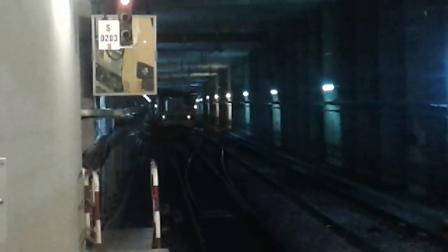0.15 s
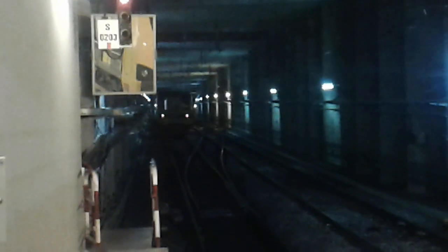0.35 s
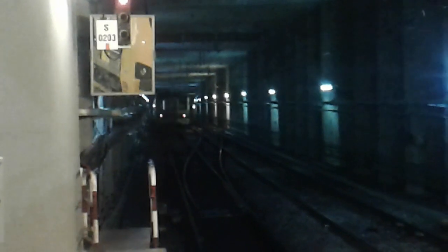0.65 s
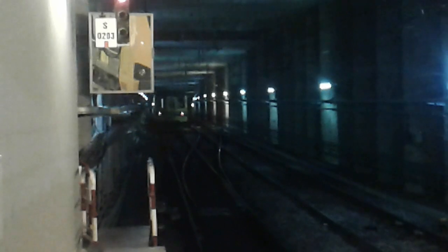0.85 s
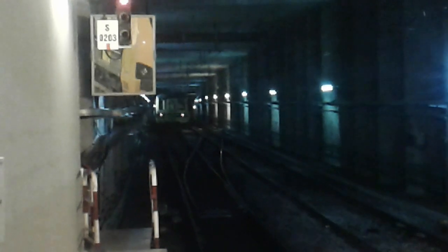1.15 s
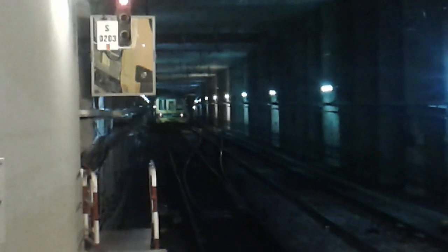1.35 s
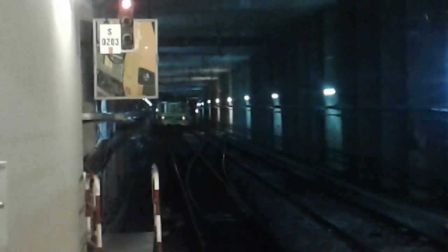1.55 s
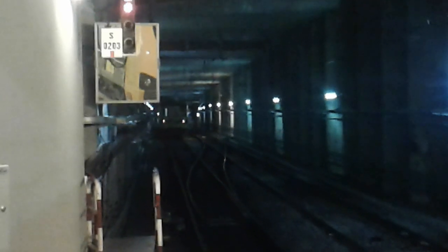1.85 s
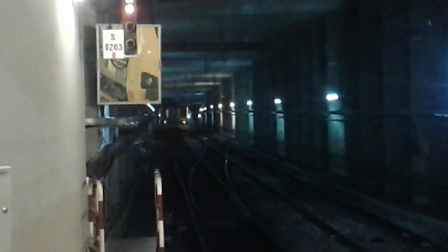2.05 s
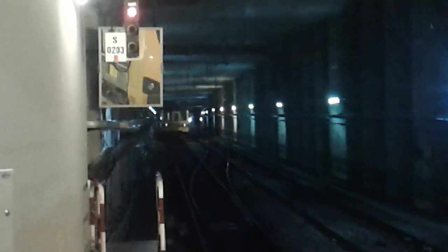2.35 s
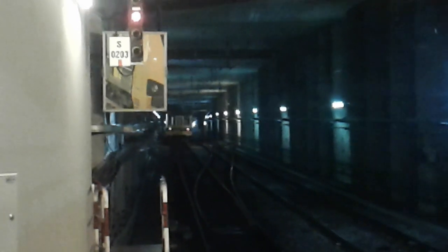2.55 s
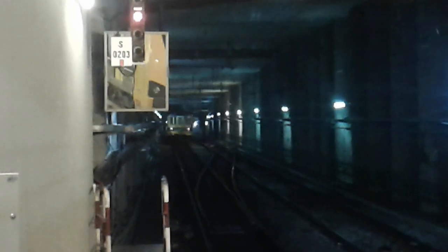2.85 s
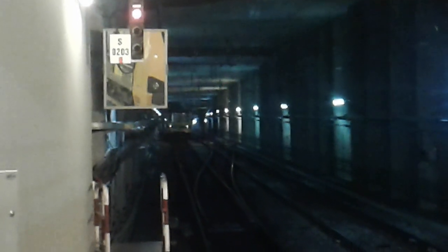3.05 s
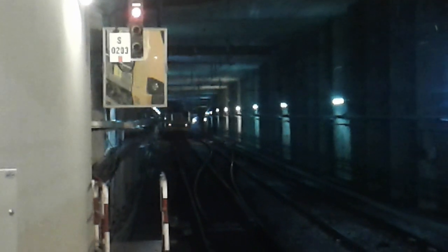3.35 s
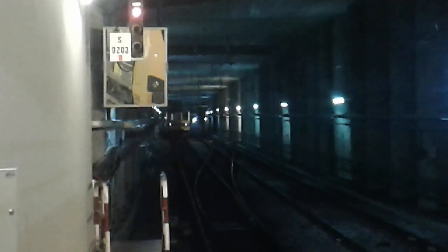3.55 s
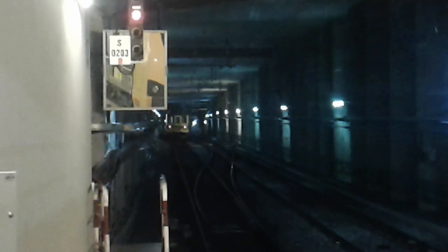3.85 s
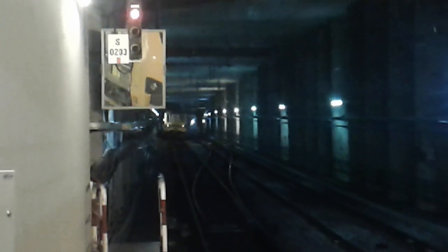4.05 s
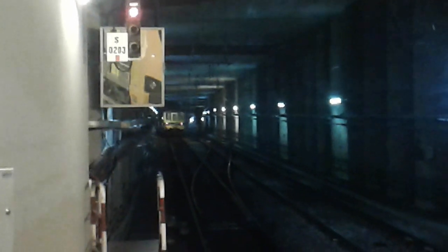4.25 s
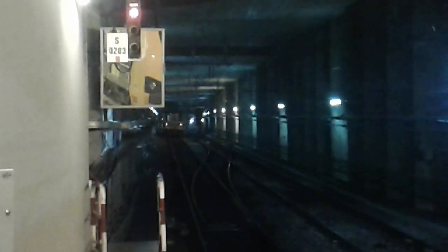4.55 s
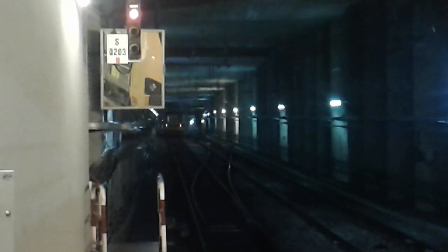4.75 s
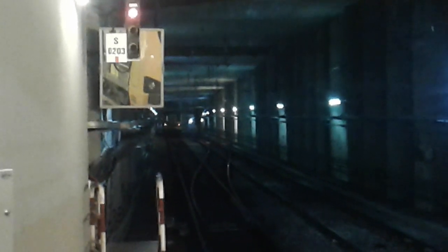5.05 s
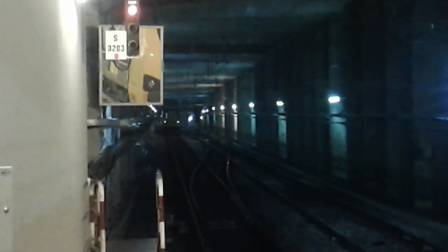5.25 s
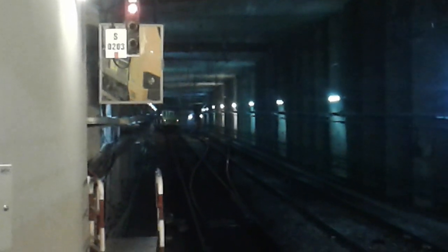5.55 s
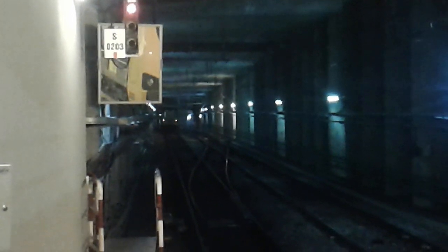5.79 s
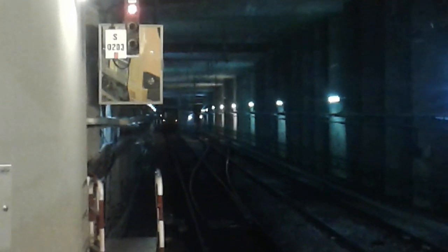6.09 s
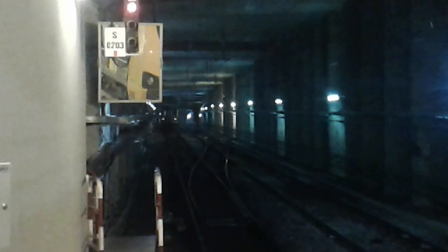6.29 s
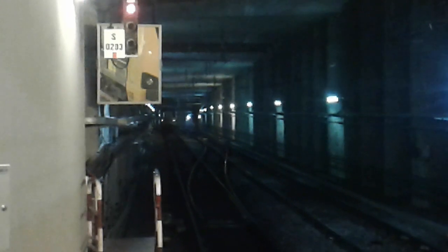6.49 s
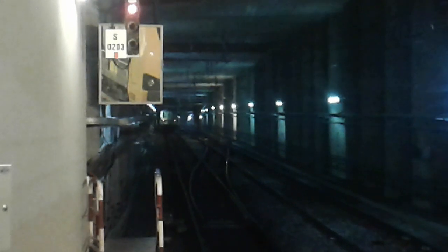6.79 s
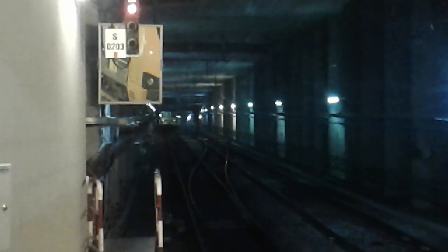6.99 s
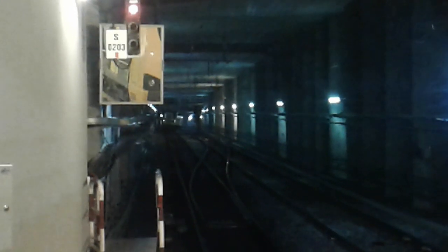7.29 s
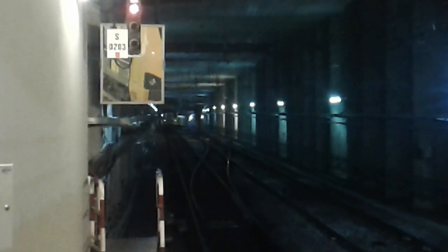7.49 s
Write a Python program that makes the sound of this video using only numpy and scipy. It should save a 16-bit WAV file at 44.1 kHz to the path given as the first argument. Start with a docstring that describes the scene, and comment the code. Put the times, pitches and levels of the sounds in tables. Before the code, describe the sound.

From a station platform, a departing subway train is heard rumbling and droning in an echoing tunnel, with a quick run of dull thuds from the rail joints and a brief ringing scrape. The drone dies away and the rumble slowly recedes. Past the middle come two low, swelling booms and more distant thuds, then two fainter wheel scrapes, all over station ventilation and slight microphone hiss.

```python
"""An electric subway train rolls away down a concrete tunnel, heard from the end of the platform.
At first its rumble, wheel roar, ringing rails and gear drone fill the tunnel, and bogies thud over
rail joints. The sound fades and dulls with distance; at 1.6 s a wheel flange brushes the rail.
From about 4 s the tunnel booms twice under a second run of thuds, and two fainter brushes follow.
The station's ventilation and a faint microphone hiss persist to the end."""
import sys
import numpy as np
from scipy import signal
from scipy.fft import rfft, irfft, next_fast_len
from scipy.io import wavfile
from scipy.ndimage import map_coordinates

SR = 44100
rng = np.random.default_rng(int(sys.argv[2]) if len(sys.argv) > 2 else 0)


def generate_wav(sig):
    """Save sig (samples, or channels by samples) to the path in sys.argv[1] as 16-bit PCM at SR."""
    pcm = np.round(np.clip(np.atleast_2d(sig).T, -1, 1) * 32767).astype(np.int16)
    wavfile.write(sys.argv[1], SR, pcm)


N = 336302
TIME = np.arange(N) / SR

# Source spectra. Each row: frequency in Hz, relative spectral density in dB.
BODY_SPECTRUM = [(30, -30), (65, -13), (88, -12), (105, -3.5), (135, 2.5), (175, 2.5), (215, -2.5),
                 (270, -13.5), (340, -12), (600, -69)]
WHEEL_SPECTRUM = [(120, -21), (220, 1), (285, 3), (315, -1.5), (420, -1), (470, -3), (550, -4), (640, -14),
                  (800, -34.5), (1500, -82)]
RAIL_SPECTRUM = [(400, -8.5), (580, -2.5), (660, 2), (760, -1), (840, -2.5), (920, -7), (1030, -8),
                 (1200, -24), (1550, -29), (2600, -41), (4000, -58.5)]
CONTACT_SPECTRUM = [(700, -1), (1150, 4), (1500, -0.5), (1700, -3.5), (1900, -4.5), (2200, -10.5),
                    (2600, -15), (3300, -25), (4500, -34.5), (6000, -65.5)]
VENTILATION_SPECTRUM = [(20, -11), (45, 5), (100, 0), (400, -5.5), (560, -9.5), (780, -17.5), (1100, -19.5),
                        (1500, -27.5), (2200, -29), (3200, -35.5), (5000, -44), (9000, -71.5)]
HISS_SPECTRUM = [(100, -10.5), (3000, -7), (4500, -7), (5700, -5.5), (7300, 0.5), (12500, 0.5), (15500, 1)]
# Cross modes of the tunnel. Each row: frequency in Hz, bandwidth in Hz, lift in dB.
TUNNEL_MODES = [(88.3, 16, 8), (110, 5.1, 0.5), (155.6, 34, 2.5), (213.3, 6.2, 6.5), (291, 14, 3),
                (353, 11, 1), (520, 60, 0), (744, 28, 2.5), (840, 7.7, 1.5)]
# Swell from rougher and smoother track. Each row: time in seconds, gain in dB.
TRACK_ROUGHNESS = [(0, -0.5), (0.45, -0.2), (2.3, 0.2), (3.2, -2.5), (4.2, 1), (4.55, -0.5), (4.85, 1),
                   (5.4, 1), (5.8, 3.5), (6.1, 0.3), (6.8, 1.4), (7.6, -2.5)]
# Ringing of the rails. Each row: time in seconds, level in dB.
RAIL_LEVELS = [(0, -42.5), (1.2, -43), (3.1, -46.5), (4, -49.5), (4.4, -53), (5.6, -56), (6.3, -56),
               (6.8, -53.5), (7.6, -55.5)]
# Bogies striking rail joints. Each row: start in seconds, peak level in dB.
JOINT_BLOWS = [(0.25, -16.5), (0.453, -16), (0.545, -15), (0.783, -15.5), (0.98, -17), (1.035, -19.5),
               (1.38, -19.5), (1.599, -22), (1.719, -23), (2.233, -20.5), (4.305, -25.5), (4.826, -21),
               (4.945, -20.5), (5.019, -24), (5.649, -22), (5.8, -21.5), (5.85, -22), (5.979, -23),
               (6.576, -24)]
# Spectrum of a distant thud. Each row: frequency in Hz, relative spectral density in dB.
THUD_SPECTRUM = [(30, -30.5), (65, -19), (90, -7), (125, 1), (180, 0.5), (240, -12), (420, -17),
                 (600, -27.5), (1000, -45), (2000, -68), (4000, -100)]
# Reverberation of the tunnel. Each row: frequency in Hz, time to decay by 60 dB in seconds.
REVERB_TIMES = [(60, 2.7), (200, 1.2), (600, 0.8), (3000, 0.52)]
# Flanges brushing the rail. Each row: start in seconds, level in dB, ringing frequency in Hz.
FLANGE_BRUSHES = [(1.61, -45, 764), (5.75, -68, 1540), (6.73, -53, 780)]
# Low booms of the tunnel. Each row: time of the crest in seconds, level in dB.
BOOM_CRESTS = [(4.32, -37), (5.05, -30.5)]


def amp(db):
    """Amplitude grows tenfold for every 20 dB."""
    return 10 ** (np.asarray(db) / 20)


def unit(x):
    """Normalisation brings a signal to rms 1."""
    return x / np.sqrt(np.mean(x ** 2) + 1e-20)


def along(points, hz):
    """Interpolation on a logarithmic frequency axis joins (Hz, value) points."""
    frequencies, values = np.transpose(points)
    return np.interp(np.log(hz + 1), np.log(frequencies), values)


def curve(points):
    """Linear interpolation of (seconds, value) points gives a value for each sample."""
    return np.interp(TIME, *np.transpose(points))


def wobble(rate):
    """Spline interpolation of random knots, rate a second, gives a smooth fluctuation."""
    knots = rng.standard_normal(int(N * rate / SR) + 4)
    return map_coordinates(knots, [TIME * rate])


def filtered(x, response):
    """Linear filtering multiplies the spectrum by a frequency response."""
    size = next_fast_len(len(x) + SR // 2)
    hz = np.fft.rfftfreq(size, 1 / SR)
    return irfft(rfft(x, size) * response(hz), size)[:len(x)]


def tunnel_db(hz):
    """Standing waves between the walls lift a few narrow bands."""
    return sum(lift / (1 + (2 * (hz - centre) / width) ** 2) for centre, width, lift in TUNNEL_MODES)


def tunnel_noise(spectrum):
    """Source and filter: noise of rms 1 is coloured by its own spectrum and the tunnel's modes."""
    return unit(filtered(rng.standard_normal(N), lambda hz: amp(along(spectrum, hz) + tunnel_db(hz))))


def drone(pitch_hz, width_hz, swell_db):
    """Random modulation blurs a tone of rms 1, as its many paths along the tunnel do."""
    phase = 2 * np.pi * np.cumsum(pitch_hz + width_hz * wobble(17)) / SR
    return unit(np.sin(phase) * amp(swell_db * wobble(9)))


def body_rumble(first_doubling_s=1.0, loss_db_per_doubling=3.5):
    """Forced vibration: rough track shakes the cars, whose rumble weakens as they recede steadily."""
    turns = np.cumsum(11.7 + 0.49 * wobble(1.6)) / SR
    throb = amp(1.2 * np.sin(2 * np.pi * turns))  # worn wheels, once a turn
    distance_doublings = np.log2(1 + TIME / first_doubling_s)
    level_db = -24 - loss_db_per_doubling * distance_doublings + curve(TRACK_ROUGHNESS)
    return amp(level_db) * unit(throb * tunnel_noise(BODY_SPECTRUM))


def wheel_roar(direct_db_per_s=8.5, guided_db_per_s=0.64):
    """The tunnel is a waveguide: the direct roar is soon gone, while the guided part carries far."""
    direct = amp(-26 - direct_db_per_s * TIME)
    guided = amp(-34.5 - guided_db_per_s * TIME)
    swell = amp(0.35 * curve(TRACK_ROUGHNESS))
    return np.hypot(direct, guided) * swell * tunnel_noise(WHEEL_SPECTRUM)  # the powers add


def rail_ring():
    """Rails driven by rolling wheels radiate a broad band of ringing."""
    return amp(curve(RAIL_LEVELS)) * tunnel_noise(RAIL_SPECTRUM)


def contact_rush(fade_db_per_s=1.75):
    """Rolling contact of steel on steel makes a bright, wavering rush that fades with distance."""
    level_db = -54.5 - fade_db_per_s * TIME + 1.6 * wobble(5)
    return amp(level_db) * tunnel_noise(CONTACT_SPECTRUM)


def gear_drone(fade_db_per_s=5):
    """Attenuation with distance soon takes away the running gear's drone."""
    return amp(-29 - fade_db_per_s * TIME) * drone(pitch_hz=242.6, width_hz=6.5, swell_db=3.5)


def ventilation():
    """The station's ventilation is a stationary noise, coloured by the tunnel's modes."""
    return amp(-49) * tunnel_noise(VENTILATION_SPECTRUM)


def joint_thuds(attack_s=0.004, early_decay_s=0.027, echo_share=0.25):
    """Each impact on a rail joint excites reverberation, in which low frequencies last longest."""
    out = np.zeros(N + SR)
    t = np.arange(SR) / SR
    # the first arrivals stand above the long echo
    envelope = (1 - np.exp(-t / attack_s)) * (echo_share + np.exp(-t / early_decay_s))
    for start, peak_db in JOINT_BLOWS:
        hz, age, noise_bands = signal.stft(rng.standard_normal(SR), SR, nperseg=1024)
        decay = amp(-60 * age / along(REVERB_TIMES, hz)[:, None])
        echo = signal.istft(noise_bands * decay, SR, nperseg=1024)[1][:SR]
        brightness = 1 + 0.5 * np.exp(-start / 1.6)  # near blows are brighter than far ones
        echo = filtered(echo, lambda f: amp(along(THUD_SPECTRUM, f / brightness) + tunnel_db(f)))
        thud = envelope * echo
        out[round(start * SR):][:SR] += amp(peak_db) * thud / np.abs(thud).max()
    return out[:N]


def flange_brushes(rise_s=0.021):
    """Brief friction at the flange rings the wheel in one broad band that the tunnel draws out."""
    out = np.zeros(N)
    for start, level_db, ring_hz in FLANGE_BRUSHES:
        age = np.maximum(TIME - start, 0) / rise_s
        ring = tunnel_noise([(ring_hz / 2, -40), (ring_hz, 0), (ring_hz * 2, -35), (ring_hz * 4, -80)])
        out += amp(level_db) * age * np.exp(1 - age) * ring
    return out


def tunnel_booms(rise_db_per_s=31, fall_db_per_s=75):
    """A low resonance of the tunnel builds up slowly and drops away."""
    swell = np.zeros(N)
    for crest, level_db in BOOM_CRESTS:
        before = np.maximum(crest - TIME, 0)
        after = np.maximum(TIME - crest, 0)
        swell += amp(level_db - rise_db_per_s * before - fall_db_per_s * after)
    return swell * drone(pitch_hz=116.2, width_hz=1.61, swell_db=1.5)


def scene():
    """By superposition, the train, the ventilation and the tunnel's booms add in one channel."""
    rolling = body_rumble() + wheel_roar() + rail_ring() + contact_rush()
    return (rolling + gear_drone() + ventilation() + joint_thuds() + flange_brushes() + tunnel_booms())[None]


def record(dry):
    """The microphone adds self-noise, a hiss and a thin electronic whine, and limits the bandwidth."""
    top_hz, whine_hz = 15750, 14000
    hiss = filtered(rng.standard_normal(N), lambda hz: amp(along(HISS_SPECTRUM, hz)) * (hz < top_hz))
    whine = np.sin(2 * np.pi * whine_hz * TIME)
    self_noise = amp(-69.5) * unit(hiss) + amp(-91.5) * whine
    return filtered(dry[0] + self_noise, lambda hz: hz < top_hz)[None]


dry = scene()
out = record(dry)
generate_wav(out)
```